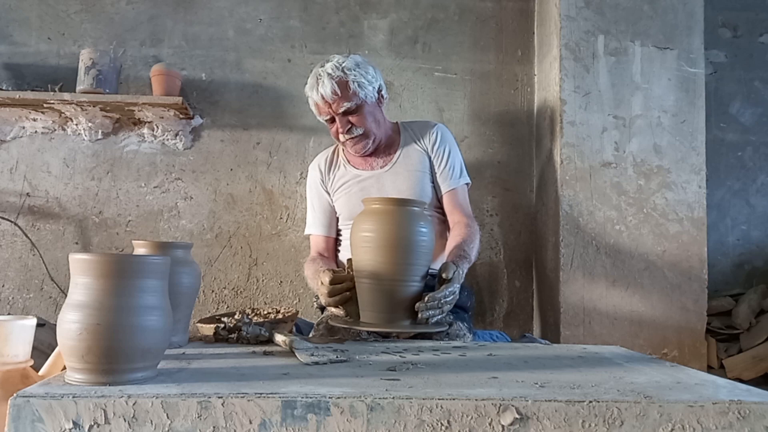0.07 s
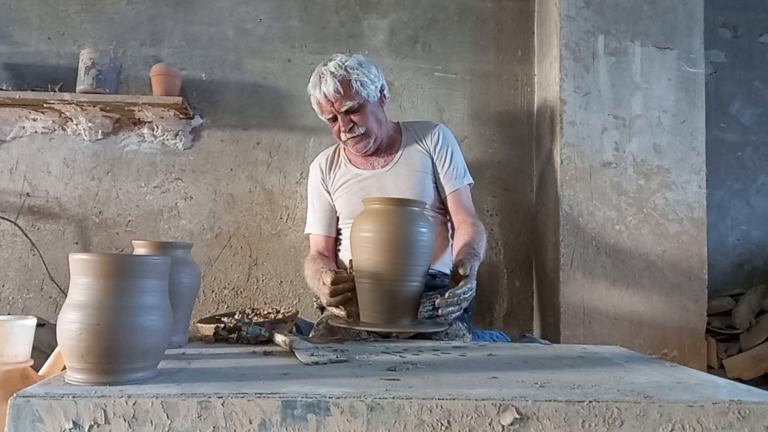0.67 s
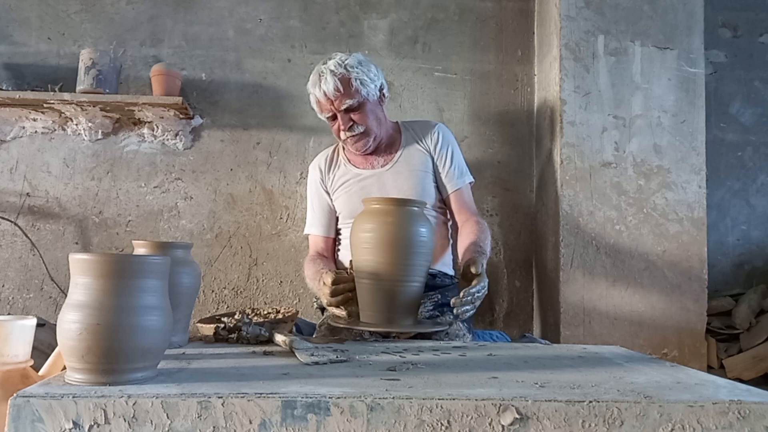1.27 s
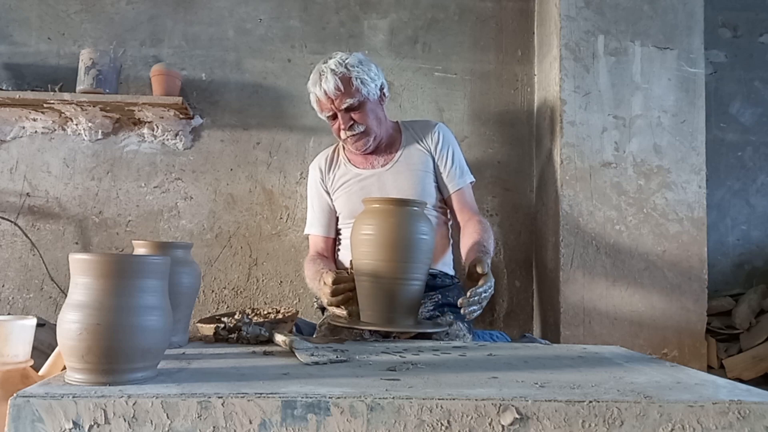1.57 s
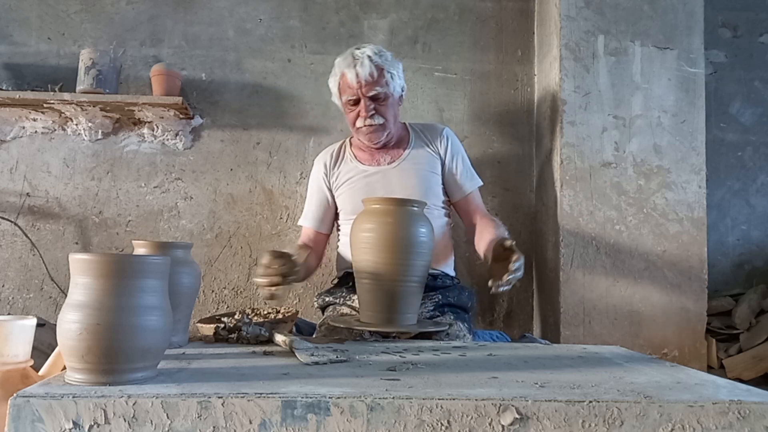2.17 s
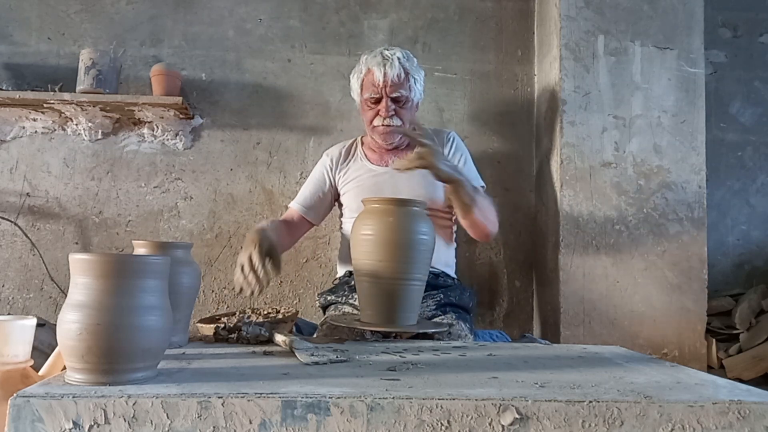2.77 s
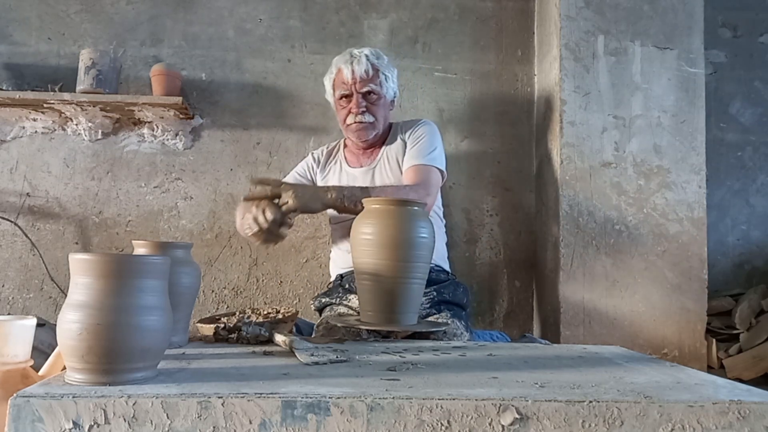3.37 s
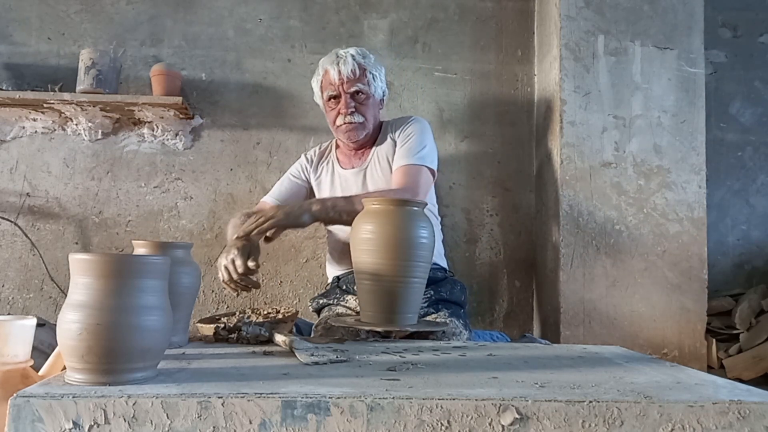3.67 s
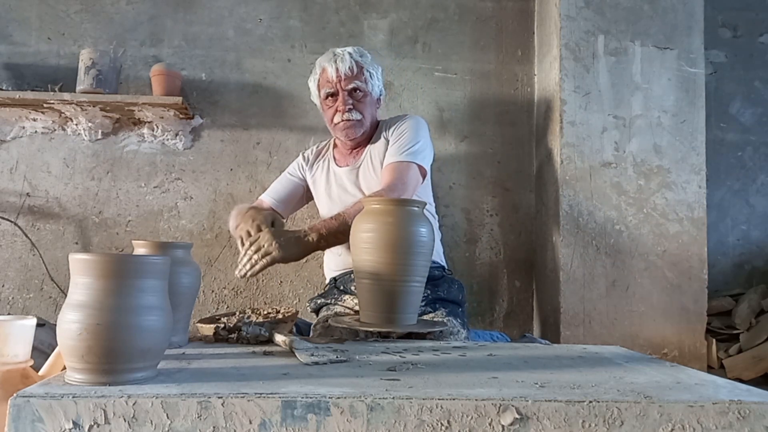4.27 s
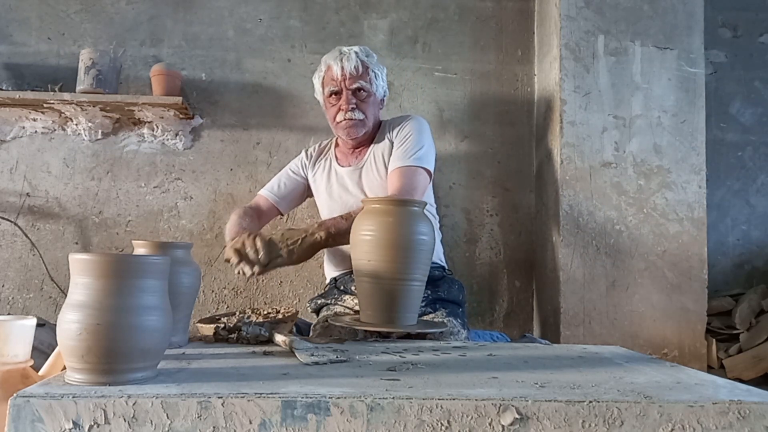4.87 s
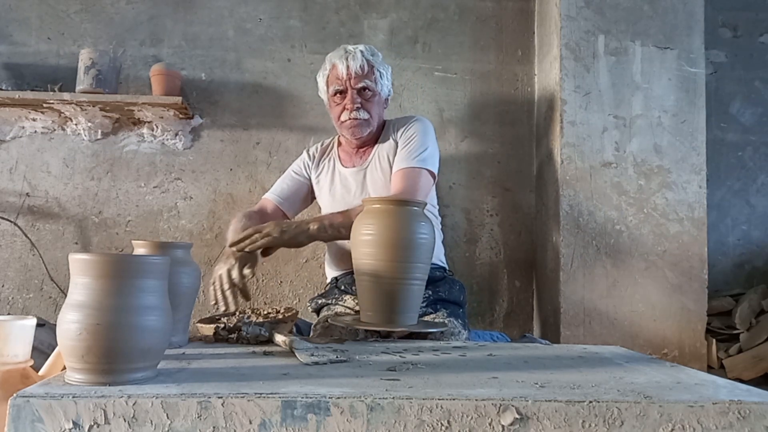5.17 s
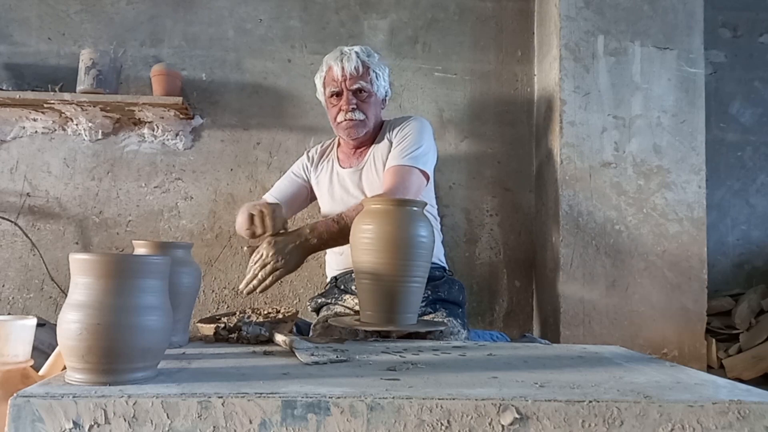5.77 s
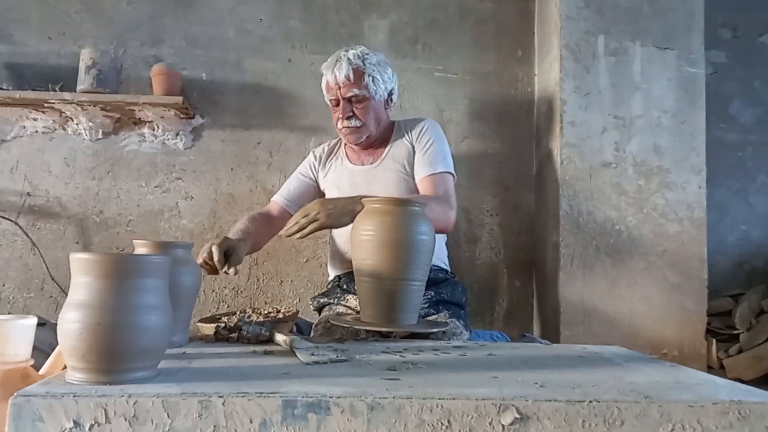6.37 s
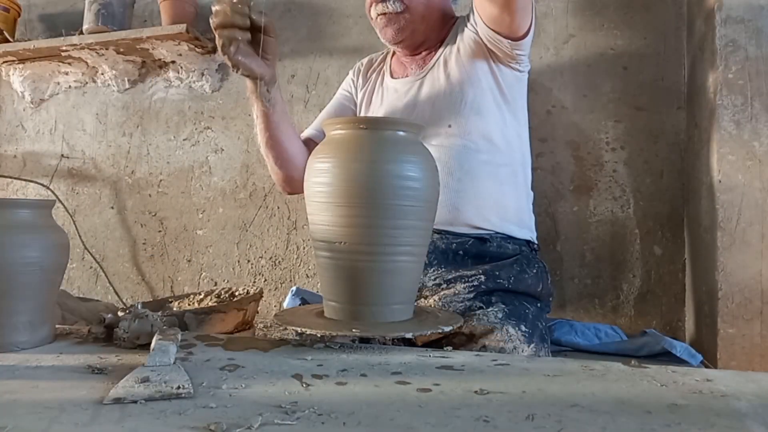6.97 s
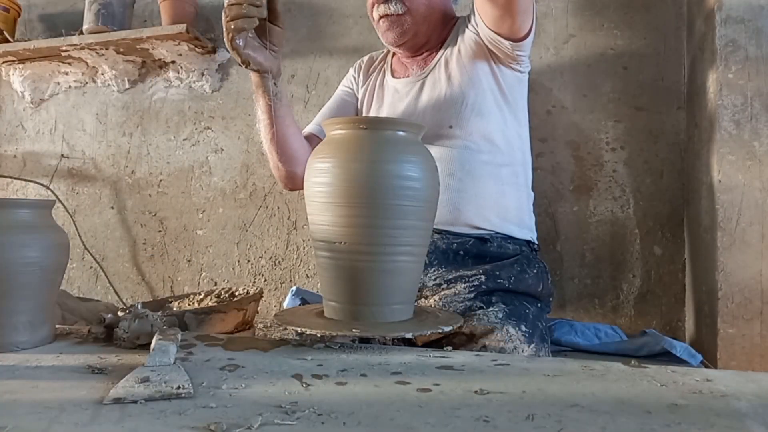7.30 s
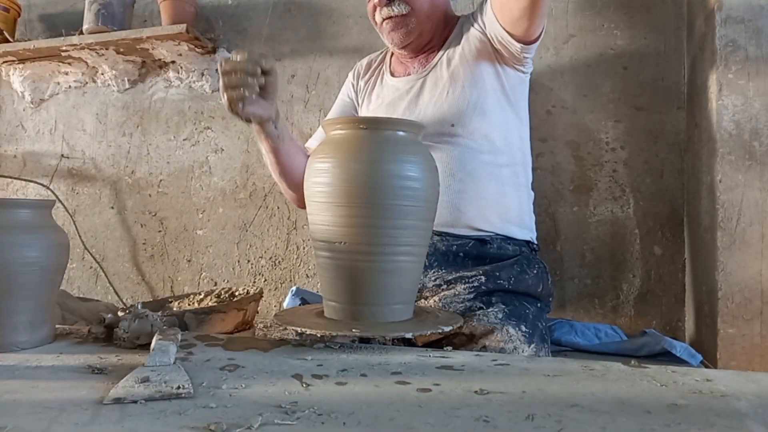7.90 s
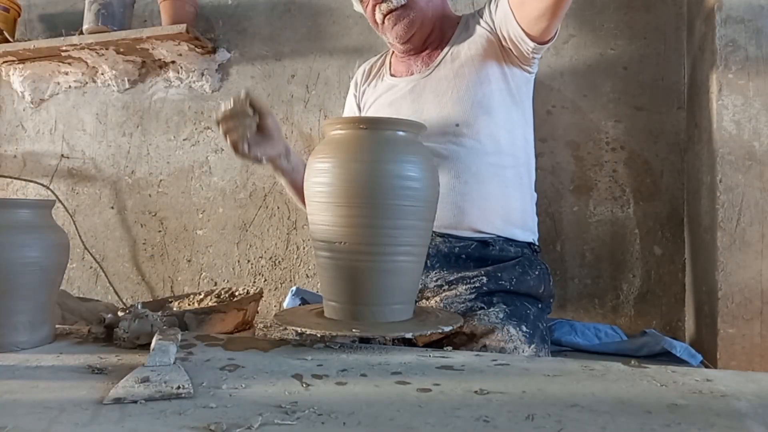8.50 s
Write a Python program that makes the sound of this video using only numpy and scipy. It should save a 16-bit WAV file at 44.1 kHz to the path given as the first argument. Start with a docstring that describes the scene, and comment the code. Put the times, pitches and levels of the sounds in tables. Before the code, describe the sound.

An electric pottery wheel runs throughout with a low hum, thin whine and bearing rush. At first a blade scrapes the turning pot, gritty and ringing, with brief squeaks. Then wet hands slide over each other, giving quiet sticky crackles, smacks and a quick cluster of pops. The small room adds a short tail. Finally the hum dips and comes back, with the microphone nearer the wheel.

```python
"""A scraper chatters against a spinning pot, over the hum, whine and bearing rush of an electric wheel.
For two seconds stick-slip friction drives the resonances of the blade and loads the motor. Then wet
clay is wiped and picked off the hands with crackles, small smacks and hollow pops. The plastered walls
of the small workshop add a short tail. Near the end the sound sinks and returns from a spot closer
to the wheel."""
import sys
import numpy as np
from scipy import signal
from scipy.fft import rfft, irfft
from scipy.io import wavfile
from scipy.ndimage import uniform_filter1d, map_coordinates

SR = 44100
rng = np.random.default_rng(int(sys.argv[2]) if len(sys.argv) > 2 else 0)


def store_pcm(level_fs):
    """Save levels as 16-bit WAV."""
    pcm = np.round(np.clip(level_fs, -1, 1) * 32767).astype(np.int16)
    wavfile.write(sys.argv[1], SR, np.atleast_2d(pcm).T)


N = 376613
TIME, FREQ = np.arange(N) / SR, np.fft.rfftfreq(N, 1 / SR) + 1e-3

HUM_HZ, SHAFT_HZ = 99.6, 24.82
LOAD_ATTACK_S, UNLOAD_S, RECOVER_S = 0.55, 2.23, 0.58
MOVE_START_S, MOVE_LENGTH_S = 6.387, 0.51
SINK_DB, SINK_FALL_S, RETURN_S, RETURN_RISE_S = -9, 0.4, 7.113, 0.41
# Parts of the running wheel: far_db, near_db, load_change_db
HUM_DB = (-27, -24.5, -6.5)
WHINE_DB = (-39.5, -43.5, -8)
RUSH_DB = (-40.5, -36, -2.5)
RUMBLE_DB = (-44.5, -42.5, -1.5)
HISS_DB = (-51, -45.2, -1)

# Relative harmonics of the hum: harmonic, far_db, near_db
HUM_HARMONICS = [(1, 0, 0.5), (2, -17.5, -22), (3, -30, -26), (4, -28, -30)]
# Relative lines of the whine: shaft_order (rounded in use), far_db, near_db
WHINE_LINES = [(6, -16, -10), (21, -10, -8.5), (22, -11, -29), (23, -0.1, 1), (24, -12, -32),
               (25, -13.5, -10), (31, -41, -2), (37, -28, -11), (38, -5.5, -7.5), (39, -11.5, -11),
               (41, -20, -11), (51, -31, -13), (54, -17.5, -28), (59, -15.5, -12.5), (62, -15.5, -13.5),
               (69.8, -13, -14), (71.2, -10.5, -34), (72.8, -15, -29)]
# Slow beating of two lines: shaft_order, beat_hz, peak_s, swing_db
WHINE_BEATS = [(21, 1.23, 0.538, 6), (23, 2.09, 0.217, 2)]
# Swells and dips of single lines: shaft_order, start_s, end_s, change_db
LINE_SWELLS = [(39, 1.84, 2.55, 7.5), (39, 4, 5.2, 3.5), (23, 4.07, 5.08, -4), (31, 7.8, 8.7, -6)]
# Spectral shape of the bearing rush: frequency_hz, far_db, near_db
RUSH_SPECTRUM = [(70, -17, -27), (138, -2.5, -1), (212, 1, 0), (370, -1, -4.5), (422, -3, -6.5),
                 (740, -6.5, -5), (858, -4, 0.5), (1210, -11, -8.5), (1630, -9, -8.5), (2000, -13.5, -11),
                 (2650, -15.5, -14), (3960, -18.5, -15), (5600, -27, -27.5), (8957, -36, -20)]
# Resonances of the motor housing: centre_hz, width_hz, far_db, near_db
HOUSING_RESONANCES = [(960, 19, 3.5, -9), (1523, 42, -5, -4.5), (1780, 33, -3, -1), (2194, 39, -4.5, -1),
                      (2340, 48, -33, -4), (4860, 150, -17.5, -15)]
# Left-right likeness of the wheel's noise: frequency_hz, correlation
MOTOR_CORRELATION = [(40, 0.18), (100, 0.52), (500, 0.57), (1000, 0.6), (1800, 0.16), (3000, -0.26),
                     (16000, -0.11)]
# Spectral shape of the low rumble: frequency_hz, relative_db
RUMBLE_SPECTRUM = [(20, -25.5), (40, -16), (62, -5.5), (80, -1.5), (100, 0), (125, -3.5), (200, -39)]
# Bouts of louder low rumble: start_s, end_s, rise_db
RUMBLE_BOUTS = [(0, 0.45, 5), (1.8, 3.05, 6), (4.197, 6.102, 5)]
# Spectral shape of the hiss: frequency_hz, relative_db
HISS_SPECTRUM = [(3000, -34), (6000, -6), (8300, -3.5), (9400, 0.5), (10300, -2), (12200, 6), (13300, 5),
                 (13900, 2), (14550, 6), (15100, 0), (16000, 2)]

# Resonances of the scraper: centre_hz, width_hz, relative_db
BLADE_MODES = [(241, 10, -18.5), (282, 5.1, -3.5), (323.6, 12, 4.5), (360.6, 27, -4.5), (394, 10, -3),
               (558, 120, -17), (903, 37, -14.5), (1235, 52, -5.5), (1270, 86, -10), (1405, 36, -16),
               (1516, 39, -14), (1692, 30, -15), (1855, 37, -21.5), (2343, 33, -16), (2558, 25, -14),
               (2628, 40, -14), (2793, 42, -23), (3990, 670, -27.5)]
# Broad rasp between those resonances: frequency_hz, relative_db
RASP_SPECTRUM = [(100, -61), (220, -35), (420, -16), (800, -11.5), (1600, -17.5), (2200, -23), (3400, -27),
                 (4500, -28), (5300, -26), (7000, -31), (9100, -19.5), (10500, -32), (12800, -24),
                 (16000, -38)]
# Left-right likeness of the scraping: frequency_hz, correlation
SCRAPE_CORRELATION = [(300, 0.96), (1200, 0.89), (2500, 0.64), (4200, 0.34), (5500, -0.54), (8500, -0.83),
                      (15000, -0.58)]
# How hard the scraper is pressed on: time_s, pressure_db
HAND_PRESSURE = [(0, -1.5), (0.05, -9), (0.11, -1.5), (0.24, 1), (0.42, 0.5), (0.49, -2), (0.57, 1),
                 (0.64, -2), (0.68, 0.4), (1.01, -0.5), (1.07, -4), (1.3, -4), (1.36, -6.5), (1.42, -3.5),
                 (1.53, -3), (1.7, -6), (1.8, -10), (1.87, -8.5), (1.95, -16), (2.05, -27)]
# Short gritty strokes as the hand eases off: centre_s, length_s, extra_pressure_db
HAND_STROKES = [(1.204, 0.058, 3), (1.323, 0.03, 4), (1.405, 0.031, 2.5), (1.55, 0.05, 1.5),
                (1.607, 0.03, 1.5), (1.738, 0.047, 3.5), (1.948, 0.017, 3)]
# Scraper voices, low to high: band_level_db, db_per_pressure_db, db_per_s (as the pot gets smoother)
BODY, RING, EDGE = (-24, 0.74, 0.12), (-28, 1.15, -0.82), (-29.5, 1.39, -0.54)
GRIT, SAND = (-35, 1.33, -2.3), (-40.5, 0.8, -1.35)
# Jumps of the blade: start_s, peak_db, centre_hz, width_hz, t60_s, rub_change_db (just before the jump)
BLADE_CATCHES = [(0.0737, -19.5, 4060, 400, .02, 5.5), (0.134, -14, 4150, 400, .015, -0.5),
                 (0.1948, -17, 3980, 900, .012, -3.5), (0.2372, -13, 3960, 1200, .01, 2.5),
                 (0.281, -16, 4060, 400, .025, 4), (0.312, -19, 4060, 600, .025, -0.5),
                 (0.398, -16.5, 4050, 600, .02, 1.5), (0.4908, -21, 4080, 500, .02, 1),
                 (0.5695, -10.5, 1900, 2500, .008, 3), (0.755, -12.5, 1220, 500, 0.031, -6),
                 (0.822, -14, 1300, 900, 0.045, -0.5), (0.882, -12, 1260, 500, .025, 3.5),
                 (0.9228, -24, 4720, 4000, .02, -2), (1.248, -14, 1230, 350, 0.025, 1),
                 (1.396, -17.5, 1250, 700, .04, -4), (1.599, -16.5, 1700, 2200, 0.032, -7)]
# Squeaks of the biting edge: centre_s, length_s, pitch_hz, width_hz, level_db
EDGE_SQUEAKS = [(0.107, 0.075, 4160, 350, -33), (0.125, 0.07, 8900, 600, -44),
                (0.22, 0.091, 2680, 250, -29), (0.296, 0.32, 4030, 259, -34)]
# Drags that make the hollow pot drone: centre_s, length_s, level_db
POT_DRAGS = [(0.152, 0.075, -21.5), (0.558, 0.07, -24.5), (0.735, 0.095, -19.5), (0.826, 0.024, -17),
             (0.951, 0.057, -20), (1.325, 0.15, -23), (1.454, 0.04, -22.5), (1.544, 0.054, -22),
             (1.742, 0.069, -21)]

# Smacks of sticky clay: start_s, peak_db, centre_hz, width_hz, t60_s
CLAY_SMACKS = [(2.451, -37.5, 2550, 500, 0.063), (2.842, -36, 10000, 4000, .03),
               (4.111, -33, 3400, 650, 0.043), (4.152, -36, 2834, 400, 0.0959),
               (4.154, -38, 7000, 1400, .04), (4.288, -34, 9000, 2500, 0.02),
               (4.750, -23.5, 8677, 5000, 0.017), (4.923, -28, 2500, 2200, 0.12),
               (4.953, -22, 13000, 5000, .04), (6.001, -11, 3580, 4000, 0.0035),
               (6.002, -31, 3900, 1500, 0.025), (6.0142, -29, 2600, 3000, .006),
               (6.0943, -11, 3000, 3300, 0.002), (6.142, -26, 13090, 4000, .015),
               (6.385, -35, 5000, 8040, 0.22)]
# Soft low thumps: centre_s, level_db, pitch_hz
LOW_BUMPS = [(2.73, -31, 80), (2.95, -28, 95.4), (4.305, -31, 66), (4.65, -23, 95), (4.78, -26, 115),
             (4.875, -32, 68), (4.97, -26.5, 78), (5.035, -30, 74.5), (5.115, -25, 85)]
# Wet palms sliding over hands and forearm: start_s, end_s, level_db
PALM_SLIDES = [(2.964, 3.72, -51.5), (4.42, 5.742, -48.5), (6.05, 6.48, -53.5)]
# Pops of clay pressed between the palms: start_s, level_db, pitch_hz, t60_s
AIR_POPS = [(6.002, -11, 411.9, 0.0093), (6.0147, -14.5, 274, 0.042), (6.0436, -8, 960, 0.011),
            (6.0466, -15, 1100, 0.04)]


def undb(db):
    """Decibels to amplitude gain."""
    return 10 ** (np.asarray(db) / 20)


def unit(x):
    """Normalise the mid signal to rms 1."""
    return x / np.std(np.atleast_2d(x).mean(0))


def across(points):
    """Interpolate (frequency_hz, value) points over log frequency."""
    hz, value = np.transpose(points)
    return np.interp(np.log(FREQ), np.log(hz), value)


def filtered(x, response):
    """Linear filtering: multiply the spectrum by a frequency response."""
    return irfft(rfft(x) * response, N)


def resonance(hz, width_hz, freq=FREQ):
    """Response of a damped oscillator, gain 1 at its centre."""
    return 1 / (1 + 1j * (freq ** 2 - hz ** 2) / (freq * width_hz))


def passband(hz, width_hz, size=N):
    """Two resonances in cascade give a band with steeper skirts."""
    freq = np.fft.rfftfreq(size, 1 / SR) + FREQ[0]
    return resonance(hz, width_hz, freq) * resonance(hz, 3 * width_hz, freq)


def band_level(x, low_hz, high_hz):
    """Rms of the mid signal within a band."""
    return np.std(filtered(x.mean(0), (FREQ > low_hz) & (FREQ < high_hz)))


def noise(size=N):
    """Two uncorrelated white noises."""
    return rng.standard_normal((2, size))


def walk(per_s):
    """Smooth random fluctuation with standard deviation 1."""
    knots = rng.standard_normal(int(N / SR * per_s) + 3)
    path = np.interp(TIME * per_s, np.arange(len(knots)), knots)
    return unit(uniform_filter1d(path, int(SR / per_s / 2)))


def impulses(per_s, scatter_db, largest=np.inf):
    """Two Poisson trains of impulses with random sign and size."""
    signs = (rng.random((2, N)) < per_s / SR) * np.sign(noise())
    return signs * undb(scatter_db * np.minimum(rng.exponential(size=(2, N)), largest))


def spread(pair, correlation):
    """Mid-side mixing gives two unrelated signals a left-right correlation."""
    likeness = np.clip(across(correlation), -.99, .99)
    mid, side = filtered(pair[0], np.sqrt(1 + likeness)), filtered(pair[1], np.sqrt(1 - likeness))
    return np.array([mid + side, mid - side])


def decay(t60_s, size=N):
    """Exponential damping, 60 dB in t60_s."""
    return np.exp(-np.log(1000) * TIME[:size] / t60_s)


def swell(centre_s, length_s, power=2):
    """Bell-shaped envelope; a higher power flattens its top."""
    return np.exp(-(2 * (TIME - centre_s) / length_s) ** power)


def ramp(start_s, length_s):
    """Linear rise from 0 to 1."""
    return np.clip((TIME - start_s) / length_s, 0, 1)


def gesture(start_s, attack_s, end_s, release_s):
    """Linear attack, hold at 1, exponential release."""
    return ramp(start_s, attack_s) * np.exp(-np.maximum(TIME - end_s, 0) / release_s)


def bout(start_s, end_s, edge_s):
    """Gate of height 1 with sloping edges."""
    return ramp(start_s - edge_s / 2, edge_s) - ramp(end_s - edge_s / 2, edge_s)


def cycle(hz, peak_s):
    """Simple harmonic swing between -1 and 1."""
    return np.cos(2 * np.pi * hz * (TIME - peak_s))


def at_listener(far_db, near_db):
    """Level crossfade as the listener moves closer."""
    return far_db + ramp(MOVE_START_S, MOVE_LENGTH_S) * (near_db - far_db)


def running_db(part):
    """Loading by the scraper holds a part's level down; it also dips as the listener moves."""
    far_db, near_db, load_db = part
    load = gesture(0, LOAD_ATTACK_S, UNLOAD_S, RECOVER_S)
    sink = gesture(MOVE_START_S, SINK_FALL_S, RETURN_S, RETURN_RISE_S)
    return at_listener(far_db, near_db) + load * load_db + sink * SINK_DB


def hum(waver_db=0.46):
    """Forced vibration: the stator buzzes at twice the mains frequency, with harmonics."""
    tone = sum(undb(at_listener(*levels_db)) * np.sin(2 * np.pi * (k * HUM_HZ * TIME + rng.random()))
               for k, *levels_db in HUM_HARMONICS)
    level_db = running_db(HUM_DB) + waver_db * walk(10)
    left_db = at_listener(far_db=1.3, near_db=3.0)
    return unit(tone) * undb(level_db) * undb([left_db / 2, -left_db / 2])


def whine(turns, near, flutter_per_order=0.0066, far_lag_s=0.00014):
    """Rotational harmonics: lines on whole shaft orders flutter and reach the right side first."""
    beats_db = {order: db * cycle(hz, peak_s) for order, hz, peak_s, db in WHINE_BEATS}
    out = 0
    for order, far_db, near_db in WHINE_LINES:
        order = round(order)
        swell_db = sum(db * bout(start, end, edge_s=0.16)
                       for line, start, end, db in LINE_SWELLS if line == order)
        level_db = at_listener(far_db, near_db) + beats_db.get(order, 0) + swell_db
        flutter = flutter_per_order * order  # the higher lines rattle more
        phase = 2 * np.pi * (order * turns + rng.random()) + flutter * walk(22)
        amplitude = undb(level_db) * (1 + flutter * walk(30))
        lag = 2 * np.pi * order * SHAFT_HZ * far_lag_s * (1 - near / 2)
        out = out + amplitude * np.sin([phase - lag, phase])
    return np.sqrt(2) * out


def whirr(pitch_hz=2190, pulse_hz=15, depth=0.66, jitter_rad=0.6):
    """Amplitude modulation: a thin tone near 2.2 kHz sings in quick, uneven pulses."""
    pulses = 1 + depth * np.cos(2 * np.pi * pulse_hz * TIME + walk(10))
    phase = 2 * np.pi * pitch_hz * TIME + jitter_rad * np.array([walk(20), walk(20)])
    return np.sqrt(2) * undb(at_listener(far_db=-18, near_db=-6.5)) * pulses * np.sin(phase)


def bearings(turns, near, clatter_gains=(.68, .9), trims_db=(-2, -1), flicker_db=0.88, depth=0.086):
    """Resonant filtering: roughness that repeats each turn and a random rush both ring the housing."""
    track_size = int(SR / SHAFT_HZ)
    track = noise(track_size)
    cage_turns = turns + 0.0015 * walk(12)  # the balls slip a little against the shaft
    clatter = track[:, (cage_turns * track_size).astype(int) % track_size]
    clatter = filtered(clatter, 1 / (1 + (FREQ / 3200) ** 4))
    rush, out = noise(), 0
    for spot, share in enumerate([1 - near, near]):
        rings = sum(undb(db[spot]) * resonance(hz, width) for hz, width, *db in HOUSING_RESONANCES)
        floor = undb(across([(hz, db[spot]) for hz, *db in RUSH_SPECTRUM]))
        drive = spread(rush + clatter_gains[spot] * clatter, MOTOR_CORRELATION)
        heard = filtered(drive, np.hypot(abs(rings), floor))
        out = out + share * undb(trims_db[spot]) * heard / band_level(heard, 650, 2400)
    pulses = 1 + depth * (np.cos(2 * np.pi * turns) + cycle(HUM_HZ, 0))
    return out * undb(flicker_db * walk(16)) * pulses


def rumble(lurch_db=1.5):
    """Band-limited noise: a low rumble wavers and grows louder in bouts."""
    low_noise = unit(filtered(spread(noise(), MOTOR_CORRELATION), undb(across(RUMBLE_SPECTRUM))))
    rise_db = sum(db * bout(start, end, edge_s=0.11) for start, end, db in RUMBLE_BOUTS)
    return undb(running_db(RUMBLE_DB) + rise_db + lurch_db * walk(6.4)) * low_noise


def wheel(speed_wander=0.000422):
    """Superposition of the wheel's parts; whine and bearings follow the same wandering shaft speed."""
    near = ramp(MOVE_START_S, MOVE_LENGTH_S)
    turns = np.cumsum(SHAFT_HZ * (1 + speed_wander * walk(3))) / SR
    return (hum()
            + undb(running_db(WHINE_DB)) * (whine(turns, near) + whirr())
            + undb(running_db(RUSH_DB)) * bearings(turns, near))


def hiss(flicker_db=0.7, ripple=0.9, taps=600):
    """Hiss of wheel and wet palms adds in power; interference shifts its colour as the arms move."""
    air, shift = spread(noise(), MOTOR_CORRELATION), np.pi * walk(2)
    first, second = (filtered(air, rfft(noise(taps) / np.sqrt(taps), N)) for _ in range(2))
    rippled = air + ripple * (np.cos(shift) * first + np.sin(shift) * second)
    heard = unit(filtered(rippled, undb(across(HISS_SPECTRUM))))
    return heard * np.hypot(undb(running_db(HISS_DB)), palms()) * undb(flicker_db * walk(36))


def slips(per_s=70, scatter_db=2, fade_s=0.0092, steady=1.73):
    """Stick-slip friction jumps at uneven moments and relaxes towards a steady rub."""
    gap, size = rng.standard_normal((int(N / SR * per_s), 2)).T
    starts = (np.cumsum(np.exp(gap / 2)) * SR / per_s).astype(int)
    jumps = np.bincount(starts, undb(scatter_db * size), N)[:N]
    return steady + signal.lfilter([1], [1, -np.exp(-1 / (fade_s * SR))], jumps)


def blade(force, rasp_db=-3):
    """Modal response: the scraper's resonances stand over a broad rasp."""
    rings = sum(undb(db) * resonance(hz, width) for hz, width, db in BLADE_MODES)
    magnitude = np.hypot(abs(rings), undb(across(RASP_SPECTRUM) + rasp_db))
    return filtered(force, magnitude * np.exp(1j * np.angle(rings)))


def scattered(grains, own_share=0.6, t60_s=0.042, size=2048):
    """Multiple reflection between pot, hands and wheel smears and colours each grain."""
    echoes = noise(size) * decay(t60_s, size)
    return filtered(grains[0] + own_share * grains, rfft(echoes, N))


def bent(x, drift=0.0045):
    """Frequency modulation: the blade flexes in the hand, so its rings wander in pitch."""
    place = np.cumsum(1 + drift * walk(16))
    return np.array([map_coordinates(channel, [place], mode="mirror") for channel in x])


def gripped(x, grip=0.42, span_s=0.043):
    """Compression: the hand's grip evens out how far the blade swings."""
    power = uniform_filter1d(np.mean(x ** 2, axis=0), int(span_s * SR))
    return x / np.maximum(power / power.mean(), 1e-6) ** (grip / 2)


def sticking(hold_s=0.0064):
    """Stick phase: the rub dips or swells while the blade holds, just before a jump."""
    return undb(sum(db * swell(start - hold_s, 2 * hold_s) for start, *_, db in BLADE_CATCHES))


def scraper(wobble_db=1.5):
    """Impact excitation: grit in the turning clay strikes the blade; pressure brings out higher rings."""
    grains = impulses(per_s=2400, scatter_db=2.5, largest=3.9) * slips()
    rub, fine = (blade(spread(force, SCRAPE_CORRELATION)) for force in (grains, scattered(grains)))
    flexed = bent(rub)
    low, middle, high, top = (1 / (1 + (FREQ / hz) ** 8) for hz in (750, 1450, 3300, 6600))  # low-passes
    voices = [(rub, low, (220, 480), BODY),
              (flexed, middle - low, (1100, 1400), RING),
              (flexed, high - middle, (1500, 3200), EDGE),
              (fine, top - high, (3500, 6500), GRIT),
              (fine, 1 - top, (6500, 14000), SAND)]
    pressure_db = np.interp(TIME, *np.transpose(HAND_PRESSURE))
    pressure_db += sum(db * swell(centre, length, power=4) for centre, length, db in HAND_STROKES)
    out = 0
    for source, response, band_hz, (db, follow, db_per_s) in voices:
        voice = gripped(filtered(source, response))
        level_db = db + follow * pressure_db + db_per_s * TIME + wobble_db * walk(35)
        out = out + voice / band_level(voice, *band_hz) * undb(level_db)
    contact = 1 - ramp(start_s=2.0, length_s=0.12)  # the blade leaves the pot
    return out * sticking() * contact


def catches(size=8192):
    """Transient excitation: each jump of the blade is a short slip that stirs one group of its modes."""
    impulse_response = blade(signal.unit_impulse(N))[:size]
    out = np.zeros((2, N))
    for start, db, hz, width, t60, _ in BLADE_CATCHES:
        slip = rng.standard_normal(size) * decay(t60, size)
        jump = irfft(rfft(slip) * rfft(impulse_response) * passband(hz, width, size))
        out[:, int(start * SR):][:, :size] += undb(db) * jump / abs(jump).max()
    return out


def squeaks():
    """Narrow-band resonance: friction swells one high ring of the edge for a moment."""
    friction = spread(noise(), SCRAPE_CORRELATION)
    return sum(undb(db) * swell(centre, length, power=4) * unit(filtered(friction, passband(hz, width)))
               for centre, length, hz, width, db in EDGE_SQUEAKS)


def drone(pitch_hz=328, waver_hz=5):
    """The hollow pot's fundamental mode wavers a little and swells with each drag of the blade."""
    strength = sum(undb(db) * swell(centre, length) for centre, length, db in POT_DRAGS)
    phase = 2 * np.pi * np.cumsum(pitch_hz + waver_hz * walk(25.06)) / SR
    return np.sqrt(2) * strength * np.sin(phase)


def room(x, wet_db, t60_s=0.071, delay_s=0.006, high_hz=5000, low_hz=1000):
    """Reverberation: the plastered walls add a short, dull tail."""
    tail = noise() * decay(t60_s) * (TIME > delay_s)
    tail /= np.sqrt(np.sum(tail[0] ** 2))
    response = rfft(tail) / (1 + 1j * FREQ / high_hz) / (1 - 1j * low_hz / FREQ)
    return x + undb(wet_db) * filtered(x, response)


def smacks(side_share=0.74, snap=4, size=8192):
    """Film rupture: wet clay parts from the fingers with a snap and a short crackle."""
    out = np.zeros((2, N))
    for start, db, hz, width, t60 in CLAY_SMACKS:
        burst = noise(size) * decay(t60, size)
        burst[:, 0] += snap  # the film of slip breaks at once
        mid, side = irfft(rfft(burst) * passband(hz, width, size))
        smack = np.array([mid + side_share * side, mid - side_share * side])
        out[:, int(start * SR):][:, :size] += undb(db) * smack / abs(mid).max()
    return out


def bumps(length_s=0.027):
    """Tone bursts: a few swings of a low sine are heard as a soft thump."""
    return sum(undb(db) * swell(centre, length_s) * np.sin(2 * np.pi * (hz * TIME + rng.random()))
               for centre, db, hz in LOW_BUMPS)


def palms():
    """Amplitude envelope of sliding friction between wet palms and skin."""
    return sum(undb(db) * bout(start, end, edge_s=0.23) for start, end, db in PALM_SLIDES)


def wiping(centre_hz=10500, width_hz=9000, share_db=-6):
    """Shot noise: wet slip tears between the sliding fingers in many tiny crackles."""
    crackles = impulses(per_s=350, scatter_db=2.2)
    return palms() * undb(share_db) * unit(filtered(crackles, resonance(centre_hz, width_hz) ** 2))


def pops(attack_s=0.00027, size=8192):
    """Damped oscillation: air trapped in the clay pops with a hollow note."""
    out, age = np.zeros((2, N)), TIME[:size]
    for start, db, hz, t60 in AIR_POPS:
        envelope = (1 - np.exp(-age / attack_s)) * decay(t60, size)
        out[:, int(start * SR):][:, :size] += undb(db) * envelope * np.sin(2 * np.pi * hz * age)
    return out


def scene():
    """Superposition: wheel and hiss run throughout; the scraper rings in the room, the hands are drier."""
    background = wheel() + rumble() + bumps() + hiss()
    scraping = scraper() + catches() + squeaks() + drone()
    hands = smacks() + wiping() + pops()
    return background + room(scraping, wet_db=-5.0) + room(hands, wet_db=-7.5)


def record(dry, cutoff_hz=15900):
    """Band limiting: a steep elliptic low-pass cuts the highest treble."""
    return signal.sosfilt(signal.ellip(10, .1, 80, cutoff_hz, fs=SR, output="sos"), dry)


dry = scene()
out = record(dry)
store_pcm(out)
```